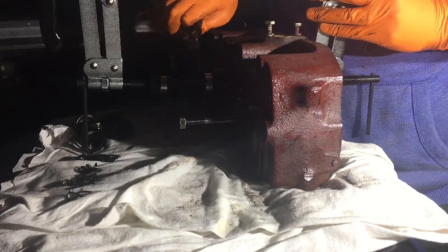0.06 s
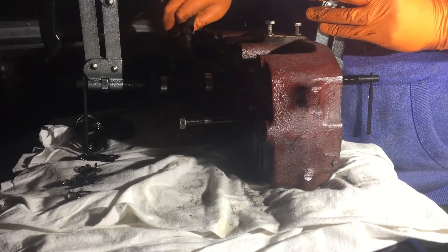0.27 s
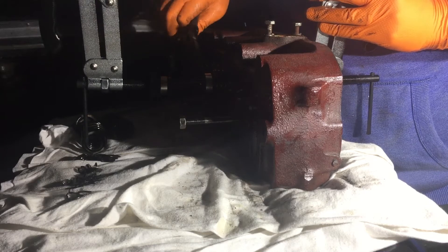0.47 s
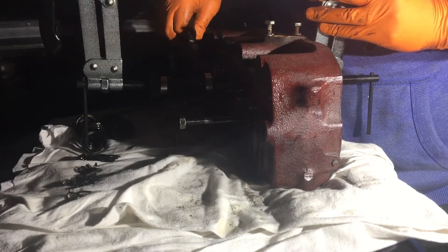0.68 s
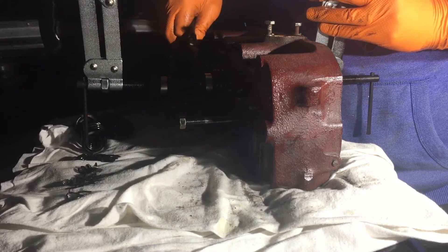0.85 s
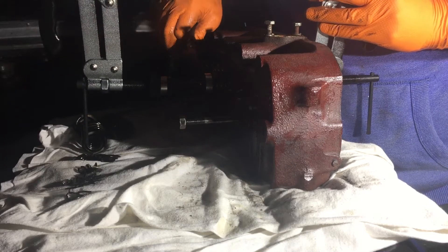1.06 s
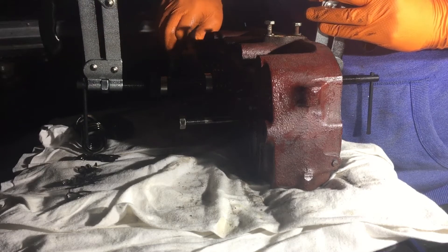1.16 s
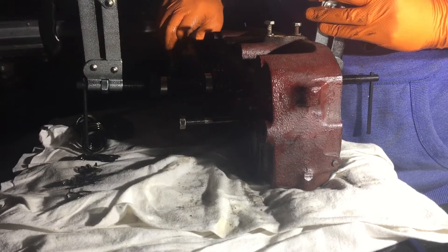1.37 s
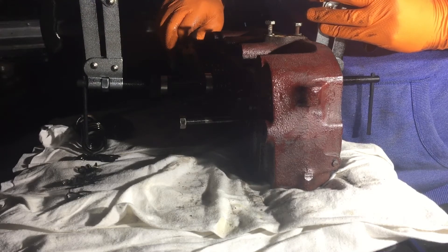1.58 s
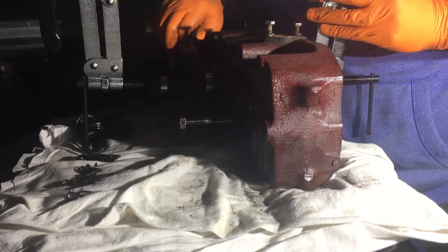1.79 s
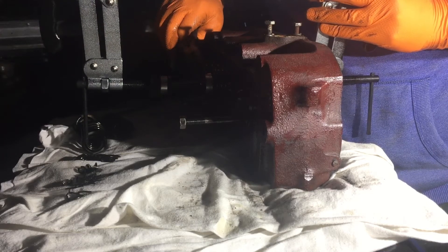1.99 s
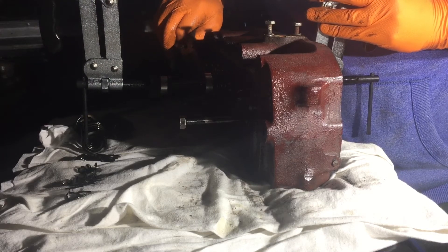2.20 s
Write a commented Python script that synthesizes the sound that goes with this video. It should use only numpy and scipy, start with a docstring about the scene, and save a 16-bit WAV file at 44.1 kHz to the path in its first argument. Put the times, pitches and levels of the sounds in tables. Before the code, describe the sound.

Irregular metallic clicks on a heavy metal part, loudest near the start and the end, with short gritty scrapes, soft bench thuds and a brief ring-down, over very faint hiss and low rumble.

```python
"""A small steel pick slips, scrapes and clicks on sticky steel parts of a cast engine part on a workshop bench.
Each click is a blow and a burst of grit, each scrape a rub of uneven grit; both ring the casting's
short damped modes, and part and bench ring down noisily after. A knocked loose piece rings as dying sines.
Firm pushes thud the bench in low, slowly building sines. Shaped noise makes quiet hiss and rumble."""
import sys
import numpy as np
from scipy import signal
from scipy.fft import rfft, irfft, next_fast_len
from scipy.io import wavfile
from scipy.ndimage import map_coordinates

SR = 44100
rng = np.random.default_rng(int(sys.argv[2]) if len(sys.argv) > 2 else 0)


def gain_from_db(level_db):
    """Turn a decibel level (scalar or array-like) into a linear amplitude factor."""
    decades = np.asarray(level_db, float) / 20
    return 10 ** decades


def log_audio(samples):
    """Write samples as a 16-bit WAV file to the path given in sys.argv[1]."""
    # one column per channel
    frames = np.atleast_2d(samples).T
    # limit to full scale, then quantise
    limited = np.clip(frames, -1, 1)
    pcm = np.round(limited * 32767).astype(np.int16)
    wavfile.write(sys.argv[1], SR, pcm)


N = 99225  # length in samples
RISE_S = 0.0004  # how fast a steel contact starts


def unit(x):
    """Scale to rms 1."""
    return x / np.sqrt(np.mean(x ** 2) + 1e-20)


def along(points, hz):
    """Read (Hz, value) points on a log frequency axis."""
    f, value = np.transpose(points)
    return np.interp(np.log(hz + 1), np.log(f + 1), value)


def filtered(x, response):
    """Shape x by a response that depends on frequency."""
    size = next_fast_len(len(x) + 8192)
    spectrum = rfft(x, size) * response(np.fft.rfftfreq(size, 1 / SR))
    return irfft(spectrum, size)[:len(x)]


def wobble(rate):
    """A smooth random curve through rate random knots a second."""
    knots = rng.standard_normal(int(N * rate / SR) + 4)
    return map_coordinates(knots, [np.arange(N) * rate / SR])


def add(track, s, sound):
    """Mix a sound into the track at time s, in seconds."""
    part = track[round(s * SR):][:len(sound)]
    part += sound[:len(part)]


# colour of the hiss: [f/Hz, relative level/dB]
HISS_COLOUR = [(150, -16.5), (250, -3.5), (288, -6.5), (522, -12), (580, -10), (1690, -13), (1780, -15),
               (2320, -13), (13400, -24), (16500, -32.5)]
# colour of the rumble: [f/Hz, relative level/dB]
RUMBLE_COLOUR = [(15, -78), (25, -30.5), (36, -9), (59, -1.5), (107, -7), (124, -10), (197, -12),
                 (350, -26), (460, -56), (770, -120)]
# slow rise and fall of the rumble: [t/s, level change/dB]
RUMBLE_DRIFT_POINTS = [(0, 0.5), (.4, 1), (.75, 0.5), (1.0, -3), (1.5, -1.5), (2.25, -1)]


def background():
    """Smooth hiss, and a low rumble that swells unevenly, both noise shaped by their colour."""
    def coloured_noise(colour):
        return unit(filtered(rng.standard_normal(N), lambda hz: gain_from_db(along(colour, hz))))

    drift_db = np.interp(np.arange(N) / SR, *np.transpose(RUMBLE_DRIFT_POINTS))
    hiss = gain_from_db(-72 + 0.19 * wobble(3)) * coloured_noise(HISS_COLOUR)
    rumble = gain_from_db(-67 + drift_db + 2.0 * wobble(4.7)) * coloured_noise(RUMBLE_COLOUR)
    return hiss + rumble


# how long the slow ring-down of part and bench takes to fall by 60 dB: [f/Hz, decay time/s]
RING_DOWN_DECAY = [(200, 0.34), (1000, 0.32), (2500, 0.33), (5500, 0.29), (9000, 0.18), (15000, 0.24)]


def ring_down(x):
    """Add a fresh quick and slow noisy ring-down of part and bench, slow bands dying at their own speeds."""
    tail_db, gap_s = 0, 0.002
    quick_db, quick_t60_s = 5, 0.037
    hz, t, noise = signal.stft(rng.standard_normal(len(x)), SR, nperseg=256)
    slow = gain_from_db(-60 * t / along(RING_DOWN_DECAY, hz)[:, None])
    quick = gain_from_db(quick_db - 60 * t / quick_t60_s)
    tail = signal.istft(noise * (slow + quick), SR, nperseg=256)[1]
    gap = np.zeros(round(gap_s * SR))
    delayed_tail = np.r_[gap, tail / np.linalg.norm(tail)]
    return x + gain_from_db(tail_db) * signal.fftconvolve(x, delayed_tail)[:len(x)]


# modes of the casting and its small parts: [f/Hz, width/Hz, base level/dB]
CASTING_MODES = [(381.4, 69, -1), (680, 66, -7), (768, 130, -6.5), (1153, 240, -7), (1702, 184, -3),
                 (1937, 180, -3.5), (2150, 165, -4.5), (2493, 160, -5), (2830, 240, -5.5),
                 (3550, 395, -7.5), (4470, 400, -7), (5290, 280, -6.5), (5500, 230, -5.5), (5930, 350, -8),
                 (6900, 740, -14.5), (8250, 670, -12), (9400, 740, -8), (10170, 600, -12),
                 (11050, 520, -13.5), (13200, 1200, -19), (14900, 1500, -30)]


def casting(favoured_hz, treble_db, bass_db):
    """Response of the damped modes (wider dies faster), weighted by where the tip lands."""
    favour_db, favour_octaves = 8.5, 0.13  # lift of modes near the favoured pitch, and its reach
    treble_hz, bass_hz, scatter_db = 6500, 1300, 1.74
    hz, width, mode_db = np.transpose(CASTING_MODES)[:, :, None]
    lift_db = favour_db * np.exp(-(np.log2(hz / favoured_hz) / favour_octaves) ** 2)
    tilt_db = treble_db * (hz > treble_hz) + bass_db * (hz < bass_hz)
    chance_db = scatter_db * rng.standard_normal(hz.shape)
    gain = gain_from_db(mode_db + lift_db + tilt_db + chance_db)
    gain = gain * (-1) ** np.arange(len(hz))[:, None]  # neighbouring modes swing opposite ways
    return lambda f: (gain * 1j * f * width / (hz * hz - f * f + 1j * f * width)).sum(0)


# the tip scrapes along the steel: [start t/s, length t/s, level/dB, favoured f/Hz, treble level/dB]
SCRAPE_STROKES = [(0.189, 0.033, -58.5, 1900, -1.5), (1.257, .013, -65, 2020, -8),
                  (1.754, 0.027, -73.5, 6000, 1), (1.858, .05, -64.5, 5500, -3),
                  (1.894, 0.0088, -42.5, 2500, 2)]


def scrapes():
    """Uneven grit under a smooth stroke shakes the casting, then part and bench ring down."""
    grain_db, bass_db = 7, -4  # unevenness of the grit, change of the low modes
    out, t = np.zeros(N), np.arange(SR // 2) / SR
    for s, length, db, favoured_hz, treble_db in SCRAPE_STROKES:
        grains = gain_from_db(grain_db * wobble(400)[:len(t)]) * rng.standard_normal(len(t))
        rub = unit(filtered(grains, casting(favoured_hz, treble_db, bass_db)))
        stroke = np.sqrt(np.sin(np.pi * np.clip(t / length, 0, 1)).clip(0))
        add(out, s, gain_from_db(db) * ring_down(rub * stroke))
    return out


# contacts of the pick: [t/s, relative level/dB, favoured f/Hz, treble level/dB, bass level/dB]
PICK_CONTACTS = [(0.1942, -59, 7000, -18, -3), (0.2227, -19.5, 1780, -1, -3),
                 (0.2233, -15.5, 2830, 4.5, -4.5), (0.2306, -23.5, 2680, -2.5, -8),
                 (0.2391, -30.5, 1820, -1, -8), (.2490, -41, 2500, -2, -12), (.2800, -34, 1800, 3, -9),
                 (0.282, -36, 5300, 6, -10), (0.5995, -32.5, 2150, -4, -8),
                 (0.6001, -35.5, 6050, 1.5, -7.5), (0.6051, -47, 2150, -17, -13.5),
                 (0.6136, -45, 2800, -14, 0.5), (0.6643, -36, 2200, -2.5, 3), (.6720, -46, 2490, -12, -5),
                 (.6830, -52.5, 2440, -10, -3), (.9020, -43, 1950, 3, -19), (0.9073, -51, 2200, -1, 0),
                 (1.1930, -53.5, 1110, -10, 5), (1.266, -52, 2000, -13, -2), (1.2716, -34.5, 2214, -1, -5),
                 (1.274, -37.5, 2500, 3.5, 6.5), (1.2779, -42.5, 2460, -23, 3),
                 (1.285, -51.5, 2100, -15, 10), (1.7614, -63, 2514, -2.5, 6), (1.8795, -55, 2300, -7, 3),
                 (1.9034, -22, 3550, 2.5, -3.5), (1.9043, -23.5, 5400, 7, -3),
                 (1.907, -25.5, 3550, -9, -15), (1.919, -36.5, 5440, 3, -3), (1.929, -38.5, 2220, -4, -1)]


def pick():
    """Each contact sends one sharp blow inside a burst of grit through the casting."""
    snap_db, snap_t60_s = -17, 0.0053  # the burst of grit
    drag_db, drag_t60_s = -35, 0.053  # faint grit trailing the blow
    out, t = np.zeros(N), np.arange(SR // 2) / SR
    rise = 1 - np.exp(-(t / RISE_S) ** 2)
    grit = rise * (gain_from_db(snap_db - 60 * t / snap_t60_s) + gain_from_db(drag_db - 60 * t / drag_t60_s))
    blow = np.arange(len(t)) == round(RISE_S * SR)
    for s, db, *spot in PICK_CONTACTS:
        contact = blow + grit * rng.standard_normal(len(t))
        click = filtered(contact, casting(*spot))
        click = click / np.linalg.norm(click) * 4  # same energy for every click before its level
        add(out, s, gain_from_db(db) * ring_down(click))
    return out


def ringing(modes, t, waver, knots_per_s):
    """One row per mode: a dying sine with unsteady phase (waver in radians)."""
    rows = []
    for hz, db, t60 in modes:
        fade = gain_from_db(db - 60 * t / t60)
        phase = 2 * np.pi * (hz * t + rng.random()) + waver * wobble(knots_per_s)[:len(t)]
        rows.append(fade * np.sin(phase))
    return np.array(rows)


# a loose steel piece is knocked: [t/s, relative level/dB]
PIECE_KNOCKS = [(.2235, -43), (0.5985, -55), (0.6648, -40), (.6750, -55.5), (.6830, -46.5), (0.7834, -65),
                (1.9040, -55)]
# modes of the loose piece: [f/Hz, relative level/dB, time to fall by 60 dB/s]
PIECE_MODES = [(1700, -4, 0.21), (2097, 1, 0.073), (2467, 3, 0.073), (3540, -9, 0.063), (7100, -4.5, .07),
               (8340, -9, .06)]


def loose_piece():
    """The small piece rings longer and clearer than the casting."""
    out, t = np.zeros(N), np.arange(SR // 2) / SR
    for s, db in PIECE_KNOCKS:
        ring = ringing(PIECE_MODES, t, 1.06, 90.44).sum(0)
        add(out, s, gain_from_db(db - 6.5) * ring * (1 - np.exp(-t / RISE_S)))
    return out


# pushes that thud the bench: [t/s, relative level/dB, favoured f/Hz]
BENCH_PUSHES = [(.226, -38, 184), (.250, -42, 120), (0.256, -44.5, 260), (.33, -48, 150),
                (0.374, -44.5, 61), (.672, -50.5, 209), (0.682, -46, 60), (1.195, -60, 260),
                (1.77, -63, 274), (1.905, -50, 204), (1.99, -50, 61)]
# modes of the bench: [f/Hz, relative level/dB, time to fall by 60 dB/s]
BENCH_MODES = [(57, -5.5, 0.21), (111.8, 1.5, 0.305), (150, -1.5, 0.18), (186.4, 2.5, 0.16),
               (248.5, 1, .12)]


def bench():
    """A soft push sets the bench modes near its pitch swinging; low ones build up slower."""
    rise_cycles, reach_octaves = 1.39, 0.56
    out, t = np.zeros(N), np.arange(SR // 2) / SR
    hz = np.transpose(BENCH_MODES)[0][:, None]
    for s, db, favoured_hz in BENCH_PUSHES:
        reach = np.exp(-(np.log2(hz / favoured_hz) / reach_octaves) ** 2)
        rise = 1 - np.exp(-(t * hz / rise_cycles) ** 2)
        swing = ringing(BENCH_MODES, t, 0.8, 25) * reach * rise
        add(out, s, gain_from_db(db) * swing.sum(0))
    return out


def scene():
    """Pick, scrapes, loose piece, bench and background at one microphone."""
    mix = pick() + scrapes() + loose_piece() + bench() + background()
    return mix[None]  # one channel


def roll_off(x):
    """The treble ends steeply here."""
    return signal.sosfilt(signal.butter(12, 16830, fs=SR, output="sos"), x)


def record(dry):
    """Turn the finished mix into the recorded sound."""
    return roll_off(dry)


dry = scene()
out = record(dry)
log_audio(out)
```